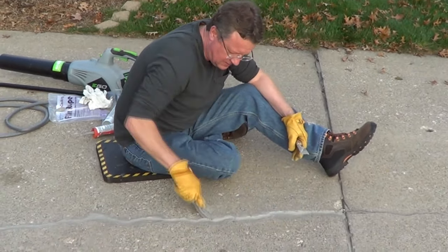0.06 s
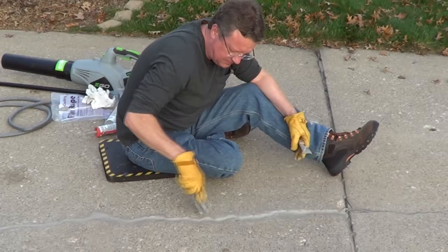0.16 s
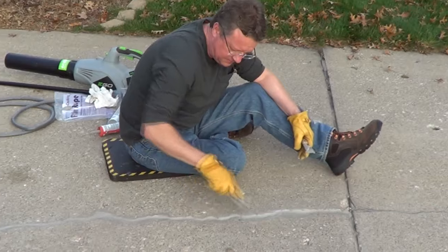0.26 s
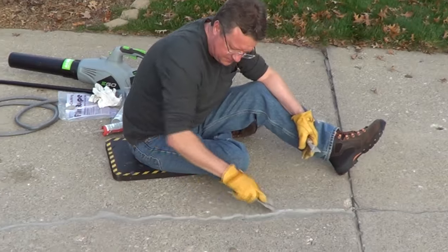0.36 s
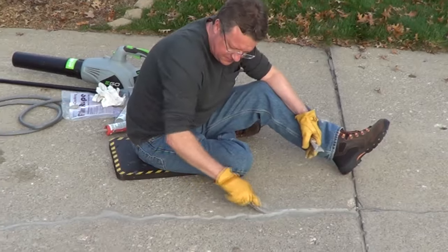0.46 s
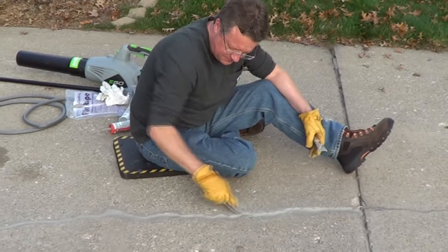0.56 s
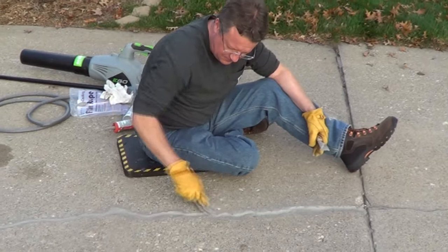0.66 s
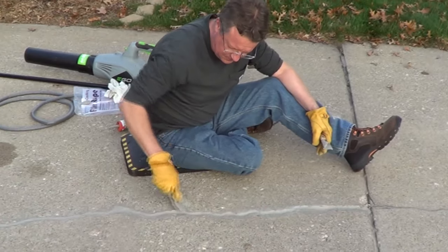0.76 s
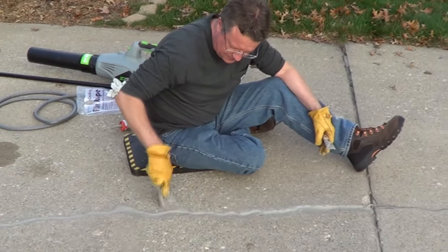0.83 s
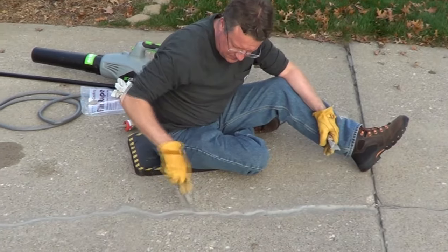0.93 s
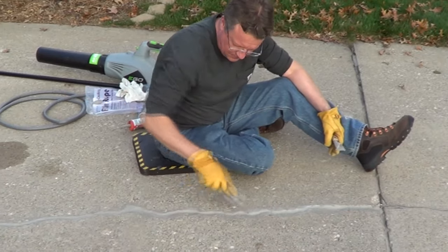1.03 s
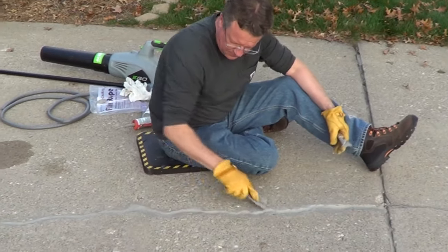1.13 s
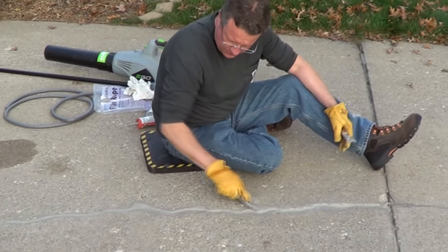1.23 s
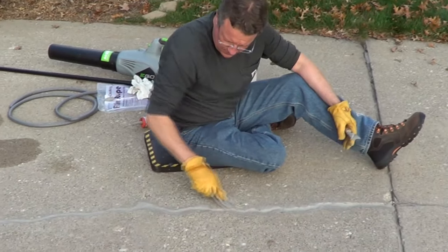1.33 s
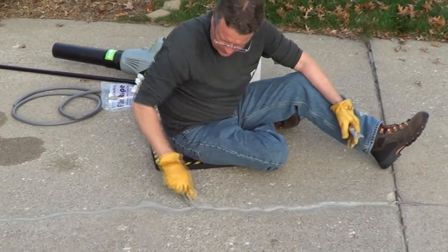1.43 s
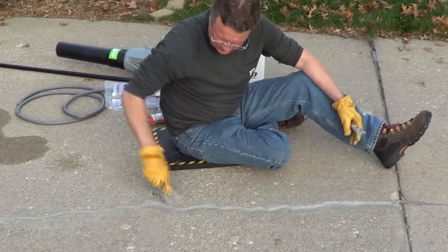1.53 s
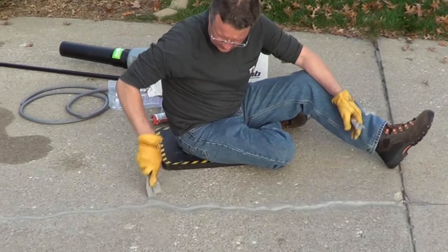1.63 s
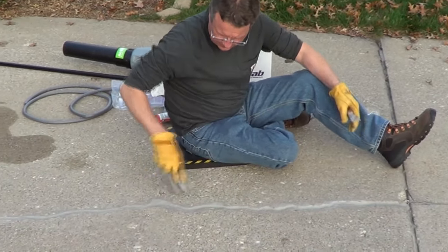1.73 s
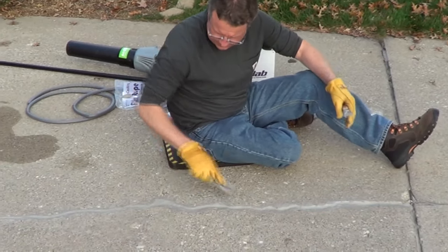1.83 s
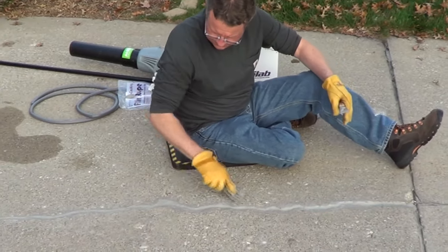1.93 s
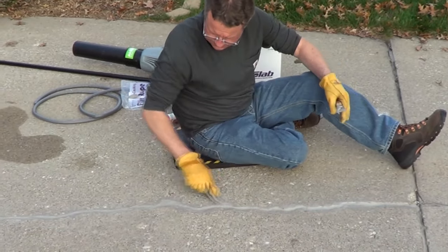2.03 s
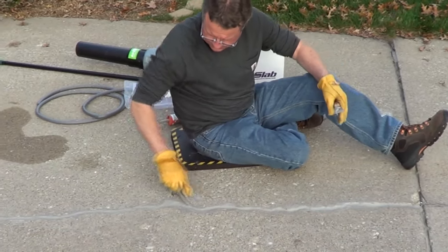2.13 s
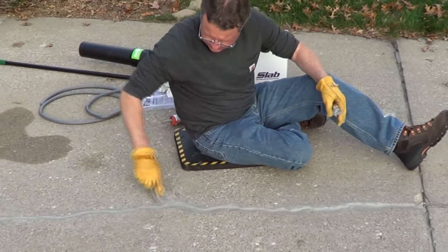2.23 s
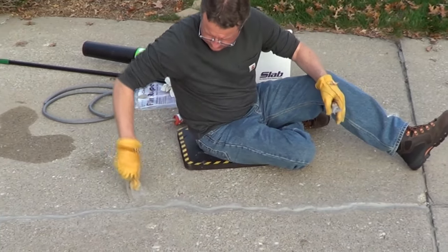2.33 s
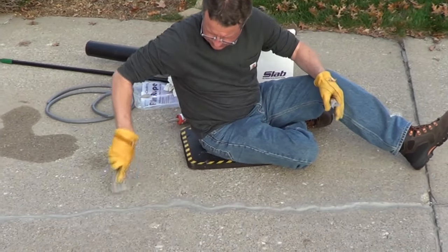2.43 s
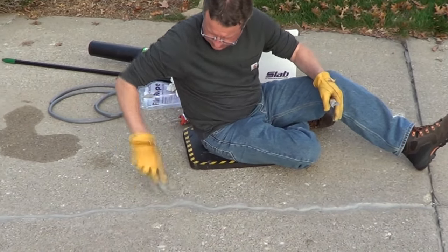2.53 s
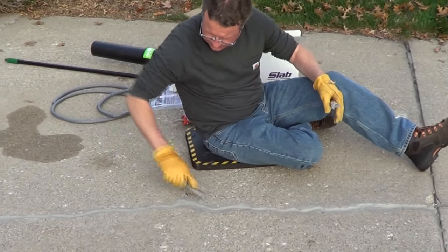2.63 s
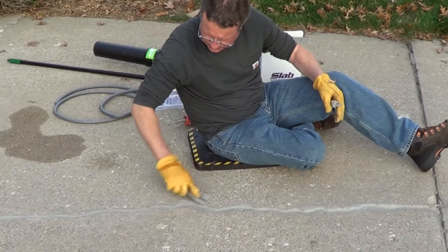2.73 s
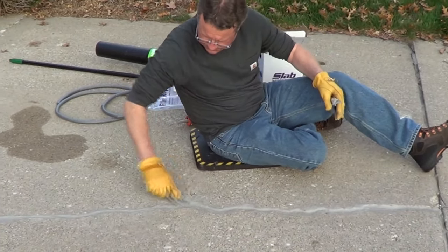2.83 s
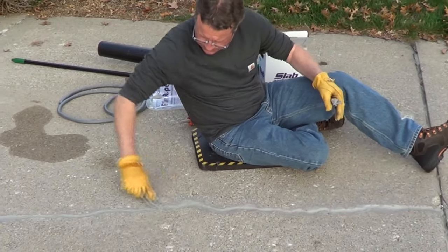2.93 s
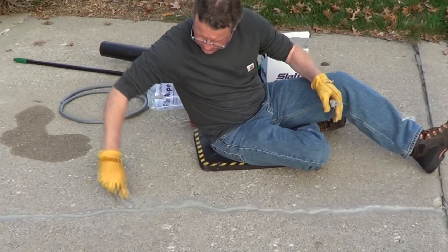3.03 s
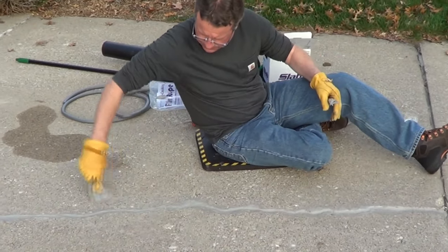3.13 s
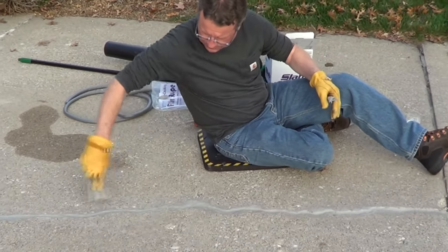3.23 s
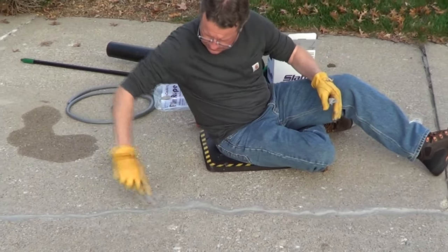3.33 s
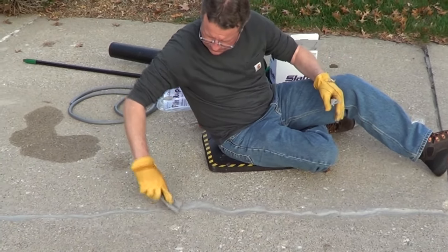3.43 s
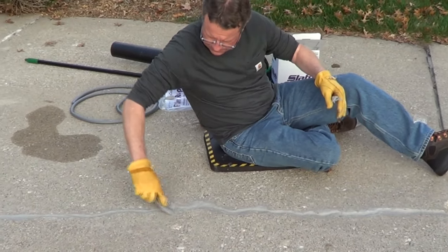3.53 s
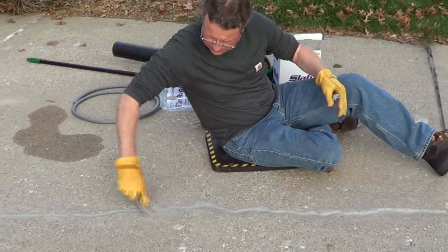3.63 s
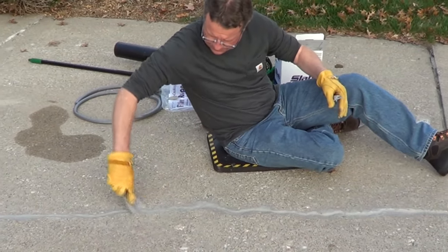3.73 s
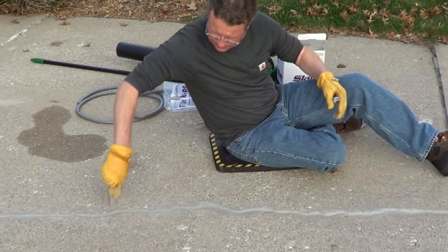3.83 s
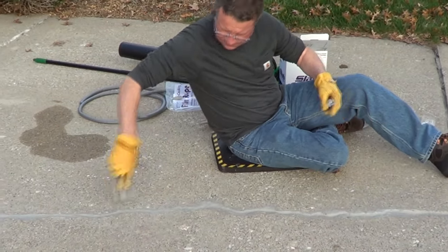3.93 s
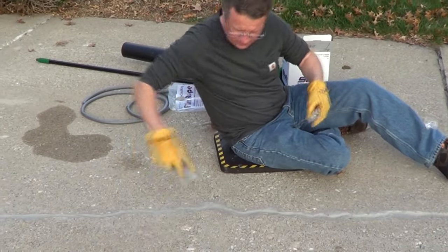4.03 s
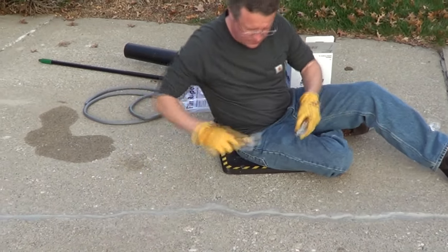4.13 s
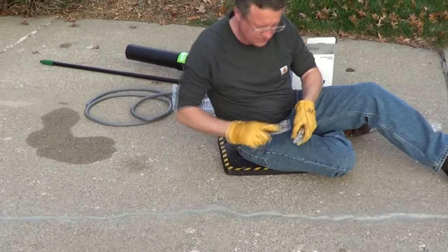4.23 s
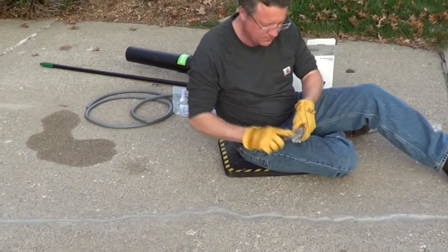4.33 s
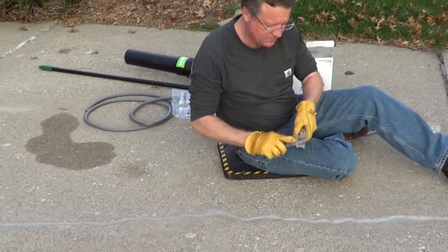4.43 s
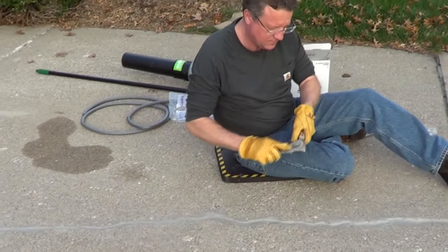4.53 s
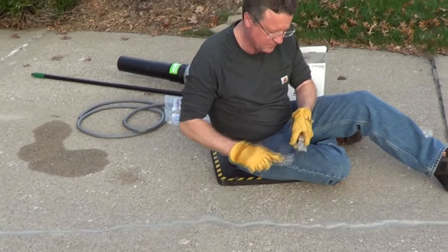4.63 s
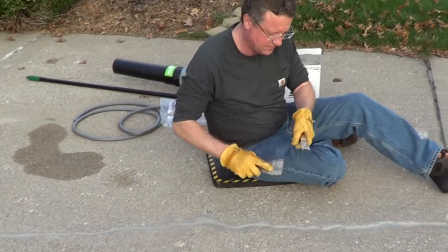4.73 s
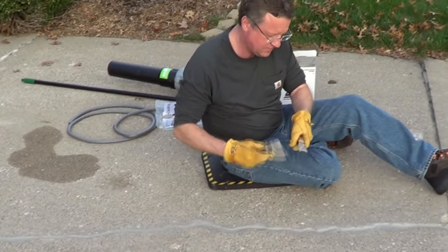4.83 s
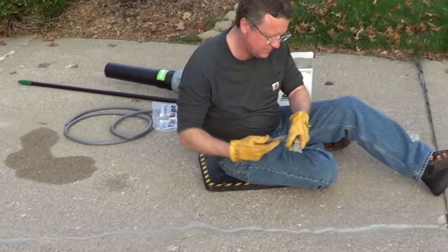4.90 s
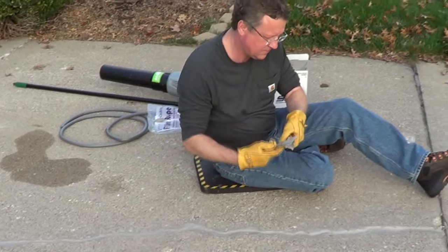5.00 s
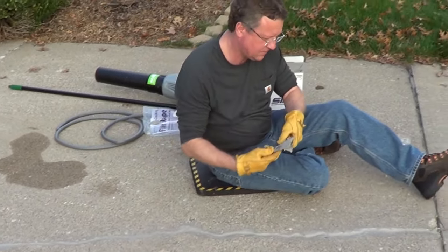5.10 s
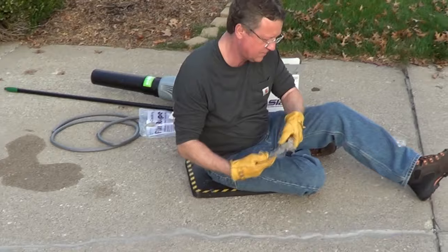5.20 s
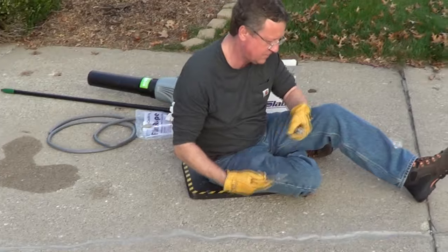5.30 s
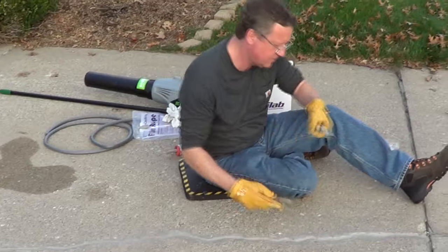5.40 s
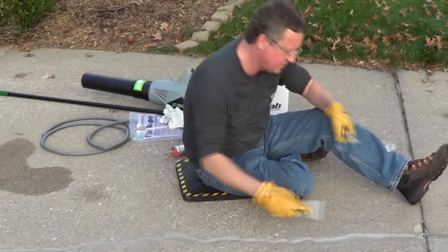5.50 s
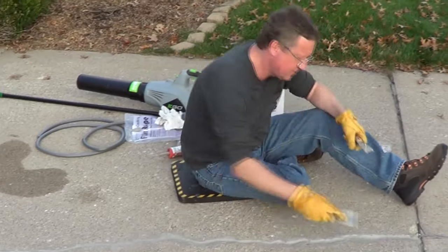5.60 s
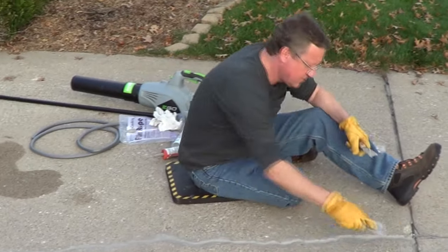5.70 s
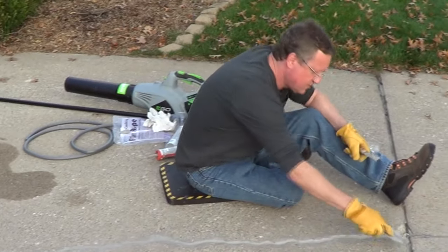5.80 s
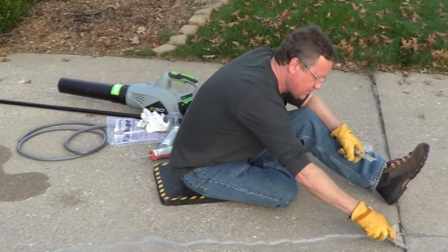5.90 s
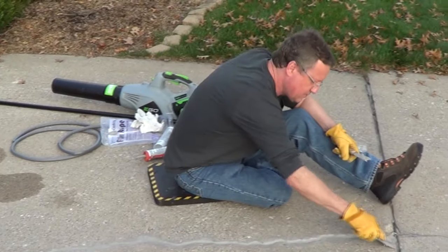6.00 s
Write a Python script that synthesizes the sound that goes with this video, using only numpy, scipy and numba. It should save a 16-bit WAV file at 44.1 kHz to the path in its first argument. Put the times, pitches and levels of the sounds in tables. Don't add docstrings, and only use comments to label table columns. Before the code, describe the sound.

Six short, harsh gritty scrapes of a thin steel blade on concrete, then quick rag wipes and snags, over faint distant traffic outdoors.

```python
import sys
import numpy as np
from scipy import signal
from scipy.fft import rfft, irfft, next_fast_len
from scipy.io import wavfile
from scipy.ndimage import uniform_filter1d
from numba import njit

SR = 44100
rng = np.random.default_rng(int(sys.argv[2]) if len(sys.argv) > 2 else 0)


def waveform_to_disk(signal):
    frames = np.transpose(np.atleast_2d(signal))
    scaled = np.clip(frames, -1, 1) * 32767
    samples = np.round(scaled).astype(np.int16)
    wavfile.write(sys.argv[1], SR, samples)


def volts(x):
    e = np.asarray(x, float) / 20
    return 10 ** e


N = 267069
T = np.arange(N) / SR
WIDE = next_fast_len(N)
HZ = np.fft.rfftfreq(WIDE, 1 / SR)

# edge lands t/s, edge bites t/s, rise to full drag/ms, edge lifts t/s, level/dB
STROKES = [
    (-.3, -.2, 40, .227, -17.5),
    (.523, .53, 45, .944, -17.5),
    (1.271, 1.288, 48, 1.732, -17.5),
    (2.057, 2.0, 90, 2.511, -17.5),
    (2.809, 2.808, 80, 3.287, -18.5),
    (3.571, 3.575, 85, 3.948, -18.5),
]
# t/s, depth/dB, length/ms
PIT_SKIPS = [
    (.897, -2.5, 8),
    (1.545, -5.5, 9),
    (2.977, -5, 6),
    (3.026, -5, 5),
    (3.582, -6, 8),
    (3.652, -8, 8),
    (3.712, -4, 6),
]
# t/s, blade lean/0 upright - 1 flat, pressure against usual/dB
HAND = [(0, .05, -.5), (.1, .3, 0), (.2, .5, 1), (.58, 0, 0), (.8, .35, .5), (.93, .9, 0), (1.33, .1, -1),
        (1.5, .6, 0), (1.72, 1., .5), (2.08, .35, -1), (2.36, .85, 0), (2.5, .55, 1), (2.9, .15, 0),
        (3.02, .35, -2), (3.27, .8, 1.5), (3.64, .3, .5), (3.8, .8, -1), (3.94, .8, 1.5)]
# f/Hz, width/Hz, level/dB
DRAGGED_MODES = [(1183, 186, -9.5), (1560, 197, -3), (2180, 197, -2), (2800, 243, -3.5), (3600, 246, -3.5),
                 (5075, 430, -3.5), (5770, 230, -10.5), (6470, 230, -8.5), (7160, 210, -10.5),
                 (8320, 740, -3.5), (10840, 1100, -6)]
# f/Hz, density/dB per Hz
GRIT_SPECTRUM = [(150, -79), (250, -34), (661, -3.5), (1090, -8.5), (1520, -5.5), (1840, -5.5),
                 (2160, -3.5), (4170, -6), (8360, -3), (11000, -9), (15900, -16)]
# f/Hz, t60/s, level/dB
YARD_ECHO = [(500, 0.52, -14.5), (1500, 0.6, -12.5), (3930, 0.74, -17.5), (8000, .5, -23.5),
             (12400, 0.17, -16)]
# t/s, level/dB
TRAFFIC = [(0, -42), (.5, -44.5), (1.2, -45.5), (2, -46.5), (2.8, -45), (3.5, -44), (4.2, -46),
           (4.5, -43.5), (5, -43), (5.5, -45.5), (6.06, -48)]
# f/Hz, density/dB per Hz
RUMBLE_SPECTRUM = [(15, -60), (25, -44), (81, -12.5), (129, -7), (229, -1.5), (302, -5.5), (329, -10.5),
                   (424, -24.5), (450, -22), (580, -39), (990, -120)]
# f/Hz, width/Hz, level against rumble/dB
ENGINE_DRONE = [(186, 10.4, -2), (281.1, 4.5, -3), (322, 7.3, -15)]
# f/Hz, density/dB per Hz
AIR_SPECTRUM = [(210, -32), (350, -6.5), (429, -10.5), (463, -5), (525, -6.5), (825, -3), (2490, -16.5),
                (2780, -20), (4720, -21.5), (8000, -24), (14500, -32.5)]
# lag/s, acts from level/dB, share taken off/ratio
GAIN_STAGES = [(.08, -30, .33), (.3, -30, .3)]
# t/s, peak/dB, low against peak/dB, loudest ring f/Hz, length/ms
TAPS = [(0.5205, -5, -14, 11600, 3.2), (0.5342, -21, -18, 8490, 1.8), (0.5432, -15, -18, 8400, 2.2),
        (0.558, -5, -16, 11500, 1.2), (0.5694, -16, -21, 8470, 1.9), (0.5808, -6, -15, 8540, 1.8),
        (1.2678, -10.5, -15, 8850, 5.4), (1.2822, -19, -19, 8500, 2.5), (1.295, -24, -13, 5300, 2.5),
        (1.3052, -11, -18, 10600, 3.2), (1.315, -17, -17, 5220, 2.5), (1.3265, -7.5, -23, 8590, 2.5),
        (2.0533, -4.5, -24, 9020, 3), (2.0594, -6, -20.5, 7740, 2.8), (2.805, -12, -16, 9400, 4.6),
        (2.8399, -25, -26, 10300, 2.5), (2.8548, -7.5, -9, 11600, 2.1), (3.5673, -10.5, -15.5, 9200, 4.3),
        (3.5937, -15, -29, 5040, 5.7), (3.608, -14, -16, 7920, 2.5), (3.6172, -11, -18, 4800, 3),
        (3.6378, -10, -22, 7920, 3), (3.6553, -11, -21, 8620, 1.8), (6.0524, -24, -21, 1680, 2.8)]
# f/Hz, width/Hz, level/dB
FREE_MODES = [(1650, 220, -2), (3590, 200, 2), (4500, 250, -2), (5860, 260, -1), (6900, 320, -10),
              (8900, 310, -4.5), (10600, 270, 1), (11600, 290, 3)]
# t/s, level/dB
TWANGS = [
    (1.76, -42),
    (3.955, -37),
]
# t/s, level/dB
WIPES = [
    [(4.52, -62), (4.556, -45.5), (4.63, -44.5), (4.68, -47), (4.692, -43), (4.701, -40), (4.713, -23),
     (4.727, -55), (4.76, -64)],
    [(5.118, -33), (5.132, -54), (5.148, -31), (5.19, -44)],
    [(5.19, -43), (5.197, -30), (5.212, -33), (5.292, -32.5), (5.314, -23), (5.321, -27), (5.329, -50),
     (5.35, -55)],
]
# f/Hz, density/dB per Hz
RAG_SPECTRUM = [(710, -32), (1200, -5), (1620, -11), (2060, -6.5), (2980, -3), (3240, -6.5), (4950, -7),
                (9060, -5.5), (15900, -10)]
# f/Hz, width/Hz, level/dB
HELD_MODES = [(2000, 520, -8), (3500, 380, -3), (5400, 500, -2), (6900, 560, -7), (8600, 800, -5.5),
              (11500, 650, -2)]
# t/s, peak/dB, low against peak/dB, loudest ring f/Hz, length/ms
SNAGS = [(4.4428, -30, -2, 2610, 3.0), (4.4464, -34, -5, 1730, 4.2), (4.4598, -24.5, -9, 4500, 3.0),
         (4.5261, -41, -15, 6620, 3.0), (4.5476, -25.5, -22, 10700, 3.6), (4.5744, -38, -19, 4560, 3.5),
         (4.5994, -31, -19, 9020, 3.6), (4.6299, -29, -18, 9190, 3.7), (4.6544, -31, -14, 1520, 3.5),
         (4.6922, -18, -12.5, 13000, 2.5), (4.711, -15, -13, 9800, 6.4), (4.7159, -11.5, -19, 1640, 1.8),
         (4.8794, -35, -10, 1830, 3.0), (5.1128, -5.5, -17, 8750, 3), (5.1462, -18, -23, 8420, 4),
         (5.1574, -21, -20, 11500, 3.0), (5.1674, -29, -18, 8440, 3.0), (5.1774, -27, -30, 6790, 2.7),
         (5.1953, -13, -22, 7840, 4.4), (5.1984, -19, -21, 7770, 2.7), (5.235, -23, -17, 8790, 4.3),
         (5.2774, -23, -18, 6610, 2), (5.3115, -8, -28, 10600, 3.7), (5.3135, -11.5, -14, 5770, 6.6)]
# f/Hz, level/dB
SCATTER = [(100, -45), (600, -28), (1500, -14), (3000, -11), (6500, -11), (8300, -14), (10000, -21.5),
           (12000, -40)]
# f/Hz, level/dB, lead/rad
PORTS = [(40, -25, 1.4), (150, -11.5, 1.47), (610, -3, 1.45), (1300, -1, 1.35), (2700, -6.5, 1.2),
         (5000, -8.5, 1.15), (6500, -10, 0.98), (8300, -19, 0), (11000, -38, 0.26)]

# upright, change when flat, per dB of pressure, once lifted
UPRIGHT_DB, FLAT_DB, PRESSED_DB_PER_DB, LIFTED_DB = (-9, -6.5, -3), (4, -1, -7), (-.3, -.8, -.3), (5.5, -4.5, -9)
LOW_BEND, HIGH_BEND = (.92, .1), (1.015, -.03)
SKID_DB, SKID_MS, BITE_DB = -19, 10, -24
LIFT_MS, TRAIL_DB, TRAIL_MS = 5, -10, 20
YARD_DB, YARD_DB_PER_S = -2.2, .65
DEEP_DB, DEEP_DB_PER_S = -18.5, 1.8
AIR_DB = -42.8
WHINE_HZ, WHINE_DB, WHINE_SKIRT_DB = 15735, -20, -25
TWANG_HZ, TWANG_WIDTH_HZ, TWANG_MS = 880, 90, 35
RUB_DB, RUB_DB_PER_DB = (-5.5, -6, -7), (-.2, 0., .12)  # low, middle, top at -35 dB; harder is brighter
TOP_HZ = 15790


def unit(x):
    return x / np.sqrt(np.mean(x ** 2))


def even(x, s):
    size = int(s * SR)
    power = uniform_filter1d(uniform_filter1d(x ** 2, size), size)
    return x / np.sqrt(power + 1e-12)


def along(table, hz, column=1):
    table = np.array(table, float)
    return np.interp(np.log(hz + 1), np.log(table[:, 0]), table[:, column])


def colour(x, table):
    size = 4096
    response_db = np.maximum(along(table, np.fft.rfftfreq(size, 1 / SR)), -90)
    cepstrum = irfft(np.log(volts(response_db)), size)
    cepstrum[1:size // 2] *= 2
    cepstrum[size // 2 + 1:] = 0
    impulse = irfft(np.exp(rfft(cepstrum)), size)[:size // 2]
    return signal.oaconvolve(x, impulse)[:N]


def ring(x, hz, width_hz):
    return signal.lfilter(*signal.iirpeak(hz, hz / width_hz, SR), x)


def split(x, *edges_hz):
    below = [0 * HZ] + [1 / (1 + (HZ / edge) ** 8) for edge in edges_hz] + [1 + 0 * HZ]
    spectrum = rfft(x, WIDE)
    return [irfft(spectrum * (b - a), WIDE)[:N] for a, b in zip(below, below[1:])]


def walk(rate_hz):
    return 1.2 * np.interp(T * rate_hz, np.arange(600), rng.standard_normal(600))


def strokes():
    gain, lifted = np.zeros(N), np.zeros(N)
    for lands_s, bites_s, rise_ms, lifts_s, db in STROKES:
        after_ms = (T - lifts_s).clip(0) * 1000
        skid = volts(SKID_DB) * np.exp(-(T - lands_s).clip(0) * 1000 / SKID_MS)
        bite = volts(BITE_DB * (1 - (T - bites_s) * 1000 / rise_ms).clip(0, 3))
        edge = (1 - volts(TRAIL_DB)) * np.exp(-(after_ms / LIFT_MS) ** 2)
        corner = volts(TRAIL_DB) * np.exp(-after_ms / TRAIL_MS)
        gain += (T >= lands_s) * volts(db) * np.hypot(skid, bite) * (edge + corner)
        lifted = np.where(T >= lands_s, 1 - np.exp(-after_ms / LIFT_MS), lifted)
    skips_db = sum(db * np.exp(-((T - s) * 1000 / ms) ** 2) for s, db, ms in PIT_SKIPS)
    return gain * volts(skips_db), lifted


def grains(rate_hz, spread_db, burst_ms, smooth):
    size = np.minimum(rng.exponential(size=N), 2.5)
    slips = (rng.random(N) < rate_hz / SR) * volts(spread_db * size)
    bursts = signal.lfilter([1], [1, -np.exp(-1000 / (burst_ms * SR))], slips)
    return unit(rng.standard_normal(N) * (unit(bursts) + smooth))


@njit
def sweep(x, hz, width_hz):
    y, band, low = np.empty(len(x)), 0., 0.
    for i in range(len(x)):
        g, k = np.tan(np.pi * hz[i] / SR), width_hz / hz[i]
        v = (band + g * (x[i] - low)) / (1 + g * (g + k))
        band, low, y[i] = 2 * v - band, low + 2 * g * v, k * v
    return y


def modes(drive, table, bend, drift_db):
    total = 0
    for hz, width_hz, db in table:
        gain = volts(db + drift_db * walk(24))
        centre_hz = hz * bend(hz) * (1 + .012 * walk(20))
        total = total + gain * sweep(drive(hz), centre_hz, float(width_hz))
    return total


def scrape():
    level, lifted = strokes()
    s, *hand = np.transpose(HAND)
    lean, press_db = (np.interp(T, s, column) for column in hand)
    low_db, bright_db, top_db = (
        upright + flat * lean + pressed * press_db + up * lifted
        for upright, flat, pressed, up in zip(UPRIGHT_DB, FLAT_DB, PRESSED_DB_PER_DB, LIFTED_DB))
    low_bend, high_bend = (start + change * lean for start, change in (LOW_BEND, HIGH_BEND))

    def bend(hz):
        if hz < 1800:
            return low_bend
        return low_bend ** 0.1 if hz < 7500 else high_bend

    dense = grains(1100, 1.9, 0.43, 1.0)
    sparse = grains(550, 3.5, 1.1, .55)
    rings = modes(lambda hz: dense if hz < 4500 else sparse, DRAGGED_MODES, bend, 3.4)
    grit = 0.86 * dense + 0.59 * sparse
    push = level * volts(press_db + 0.69 * walk(60))
    bands = split(colour(grit + volts(11.5) * rings, GRIT_SPECTRUM), 3510, 6380, 10200)
    gains = volts(low_db), volts(-10), volts(bright_db), volts(top_db)
    drag = push * sum(gain * even(band, 0.024) for gain, band in zip(gains, bands))
    plain = push * unit(colour(grit + volts(2) * rings, GRIT_SPECTRUM))
    return drag, plain


def yard(x):
    t, tail = T[:SR], 0
    for hz, t60_s, db in YARD_ECHO:
        decay = 1000. ** (-t / t60_s) * np.minimum(t / 0.0042, 1)
        band = ring(rng.standard_normal(SR), hz, hz * 0.67) * decay
        tail = tail + volts(db) * band / np.sqrt(np.sum(band ** 2)) * np.sqrt(hz / SR * 3.5)
    return signal.oaconvolve(x, tail)[:N]


def duck_db(gain):
    db = 0
    for lag_s, from_db, share in GAIN_STAGES:
        keep = np.exp(-1 / (lag_s * SR))
        heard = signal.lfilter([1 - keep], [1, -keep], gain, zi=[gain[0] * keep])[0]
        db = db - share * 20 * np.log10(1 + heard / volts(from_db))
    return db


def background():
    gain = volts(duck_db(strokes()[0]))
    traffic = gain * volts(np.interp(T, *np.transpose(TRAFFIC)) + 1.5 * walk(6))
    deep = traffic * volts(DEEP_DB + DEEP_DB_PER_S * T + 2.5 * walk(4))
    low, rumble = map(unit, split(colour(rng.standard_normal(N), RUMBLE_SPECTRUM), 124))
    drone = sum(volts(db) * unit(ring(rng.standard_normal(N), hz, width)) for hz, width, db in ENGINE_DRONE)
    air, stray = (unit(colour(rng.standard_normal(N), AIR_SPECTRUM)) for _ in range(2))
    skirt = unit(ring(ring(rng.standard_normal(N), WHINE_HZ, 90), WHINE_HZ, 90))
    tone = np.sqrt(2) * np.sin(2 * np.pi * WHINE_HZ * T)
    whine = volts(WHINE_DB) * tone + volts(WHINE_SKIRT_DB) * skirt
    air = colour(air, [(12500, -0.5), (15200, -2)]) * volts(0.46 * walk(9)) + whine * volts(1.5 * walk(25))
    stray = colour(stray, SCATTER) * volts(5)
    hiss = volts(AIR_DB) * gain * np.array([air + stray, air - stray])
    return volts(-3.84) * traffic * (rumble + drone) + volts(-1.8) * deep * low + hiss


def knocks(events, body, low_hz, ring_db):
    low, high = (even(band, 0.01) for band in split(body, low_hz))
    out, size = np.zeros(N), SR // 25
    for s, db, low_db, hz, ms in events:
        at = slice(int(s * SR), min(int(s * SR) + size, N))
        t = (T[at] - s).clip(0) * 1000 / max(ms, .3)
        own = even(ring(rng.standard_normal(size), hz, hz * 0.06), .003)[:len(t)]
        share = min(volts(low_db + 5.5), .99)
        mix = share * low[at] + np.sqrt(1 - share ** 2) * high[at] + volts(ring_db) * own
        shape = np.minimum(t * 12, 1) * (np.exp(-t ** 2) + .12 * np.exp(-t / 1.6))
        out[at] += shape * volts(db - 11.5) * mix
    return out


def taps():
    white = rng.standard_normal(N)
    rings = sum(volts(db) * ring(white, hz, width) for hz, width, db in FREE_MODES)
    return knocks(TAPS, colour(white + volts(12.5) * rings, GRIT_SPECTRUM), 3450, -6.5)


def twang():
    shape = np.zeros(N)
    for s, db in TWANGS:
        after = (T - s).clip(0) * 1000 / TWANG_MS
        shape += volts(db) * np.e * after * np.exp(-after ** 2)
    return shape * unit(ring(rng.standard_normal(N), TWANG_HZ, TWANG_WIDTH_HZ))


def wipe_db():
    out = np.full(N, -120.)
    for s, db in map(np.transpose, WIPES):
        on = (T >= s[0]) & (T <= s[-1])
        out[on] = np.interp(T[on], s, db)
    return out


def rag():
    db = wipe_db()
    fibres = grains(500, 2.7, 1.4, 0.98)
    rings = modes(lambda hz: fibres, HELD_MODES, lambda hz: 1, 4.5)
    bands = split(colour(fibres + volts(9) * rings, RAG_SPECTRUM), 5000, 11000)
    harder_db = (db + 35).clip(-25, 15)
    gains = [volts(band_db + tilt * harder_db) for band_db, tilt in zip(RUB_DB, RUB_DB_PER_DB)]
    rub = volts(db + 1.3 * walk(70)) * sum(gain * even(band, .03) for gain, band in zip(gains, bands))
    return rub + knocks(SNAGS, colour(rng.standard_normal(N), RAG_SPECTRUM), 3800, 0)


def scene():
    (drag, plain), tap, cloth = scrape(), taps(), rag()
    near = drag + tap + cloth
    sent = volts(YARD_DB + YARD_DB_PER_S * T) * (plain + volts(-9.0) * tap) + volts(-8) * cloth
    scatter = rng.standard_normal(SR // 12) * np.exp(-T[:SR // 12] / 0.018)
    scatter = scatter / np.sqrt(np.sum(scatter ** 2))
    side = colour(signal.oaconvolve(near, scatter)[:N], SCATTER)
    side = side + colour(yard(sent), SCATTER) * volts(9)
    middle = near + yard(sent)
    return np.array([middle + side, middle - side]) + background() + twang()


def roll_off(x):
    return signal.sosfilt(signal.butter(12, 16840, fs=SR, output="sos"), x)


def record(dry):
    turn = volts(along(PORTS, HZ)) * np.exp(1j * along(PORTS, HZ, column=2))
    lead = irfft(rfft(dry.mean(0), WIDE) * turn, WIDE)[:N]
    mix = np.tanh(1.261 * (dry + np.array([lead, -lead]))) / 1.326
    mix = signal.sosfilt(signal.ellip(10, .2, 70, TOP_HZ, fs=SR, output="sos"), mix)
    return roll_off(mix)


dry = scene()
out = record(dry)
waveform_to_disk(out)
```